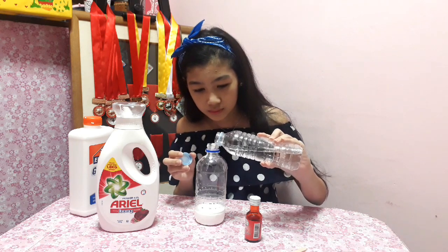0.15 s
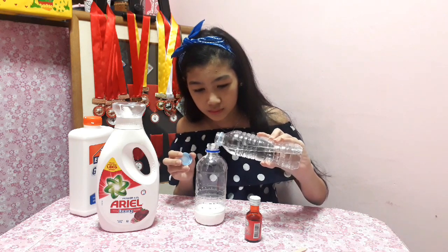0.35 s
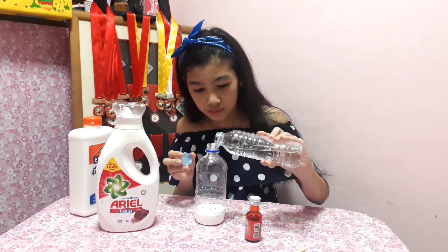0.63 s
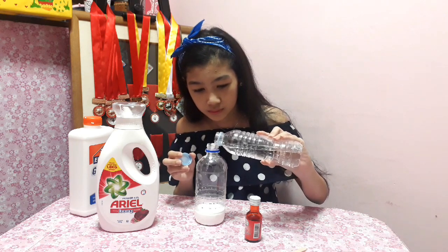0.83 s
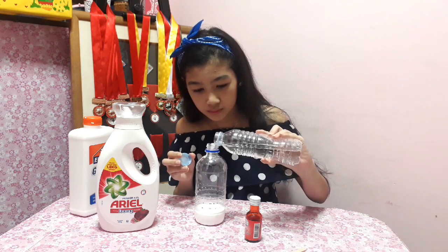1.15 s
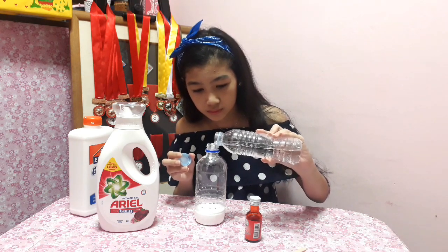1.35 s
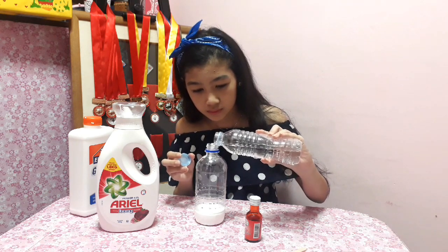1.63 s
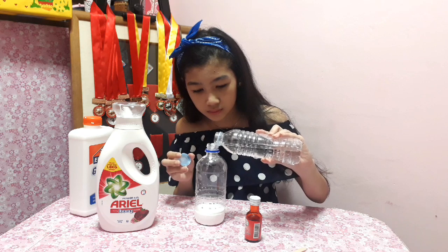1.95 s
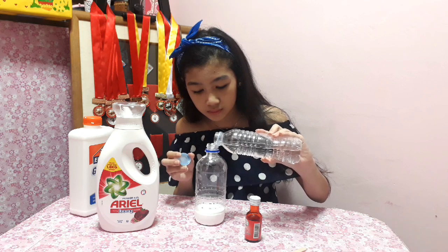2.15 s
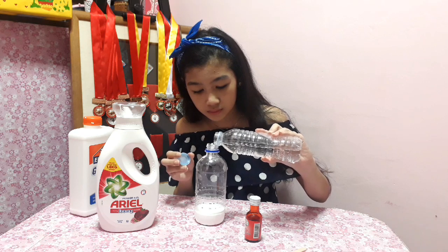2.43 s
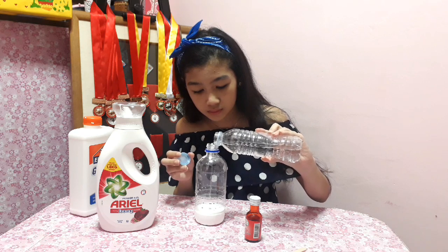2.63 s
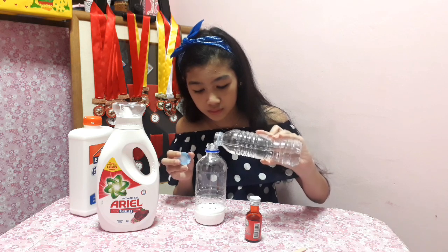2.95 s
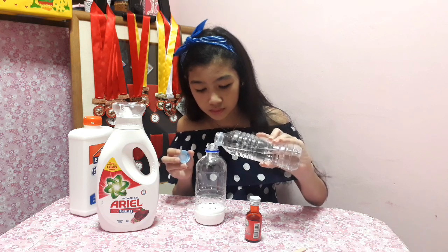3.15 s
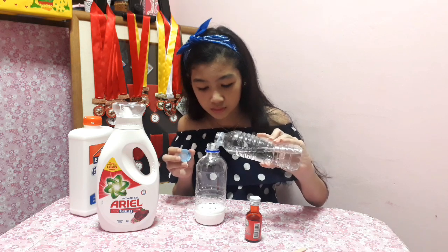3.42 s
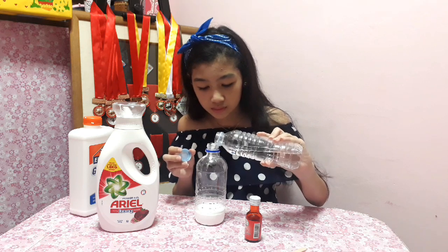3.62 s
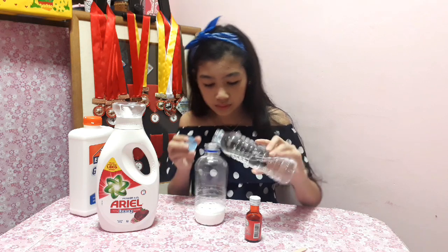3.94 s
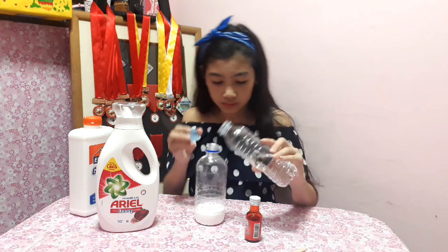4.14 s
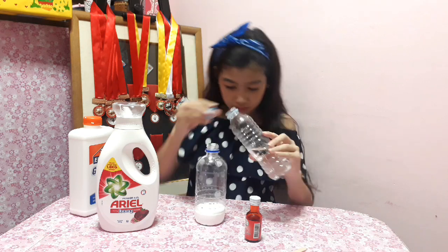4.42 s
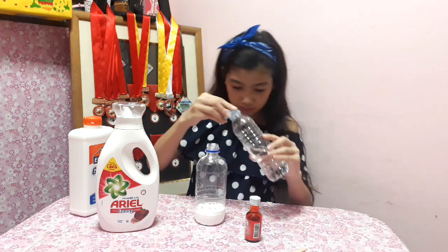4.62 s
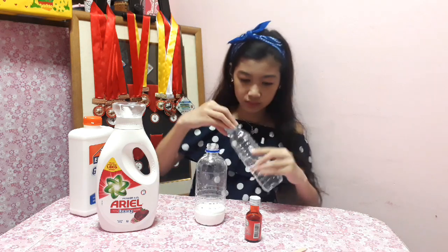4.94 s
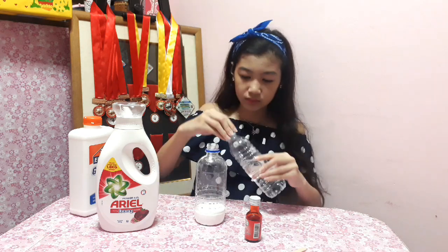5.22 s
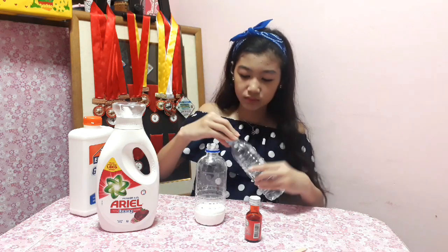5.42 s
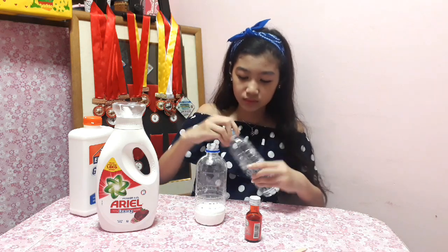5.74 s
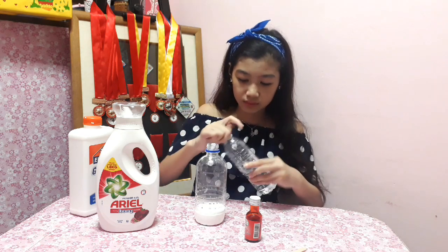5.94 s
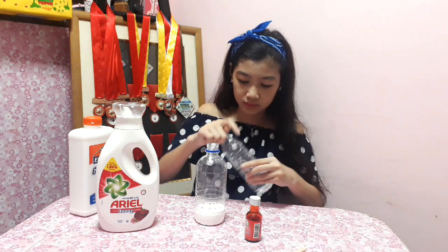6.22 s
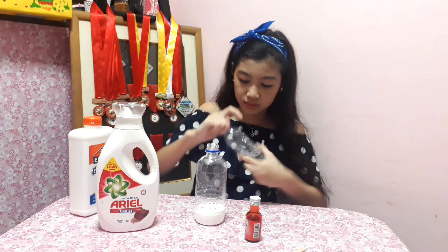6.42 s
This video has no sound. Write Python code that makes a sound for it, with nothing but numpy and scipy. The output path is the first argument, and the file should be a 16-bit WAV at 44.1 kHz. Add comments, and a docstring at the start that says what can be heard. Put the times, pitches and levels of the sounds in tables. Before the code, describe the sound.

In a small, hard-walled room, water dribbles twice from one thin plastic bottle into another, with light splashes and tiny bubbles. The bottle is raised and water glugs hollowly back inside. A cap snaps on and is screwed down with uneven rubbing and small clicks. The thin wall buckles with a loud crack, followed by a few more ticks. The sound is almost mono, straight ahead of the microphone.

```python
"""Water dribbles twice from one thin plastic bottle into another: drop impacts splash and trapped air
bubbles ring as damped oscillators. After a soft bump the bottle is raised and the water glugs back,
exciting its cavity resonances. The cap is screwed on with stick-slip rubbing, clicks and a snap, and
the thin wall buckles with a loud crack. A small, hard room adds reflections and a low murmur of air;
the sound is almost mono."""
import sys
import numpy as np
from scipy import signal
from scipy.fft import rfft, irfft, next_fast_len
from scipy.io import wavfile
from scipy.ndimage import uniform_filter1d, map_coordinates

SR = 44100
rng = np.random.default_rng(int(sys.argv[2]) if len(sys.argv) > 2 else 0)


def unload_wav(signal):
    """Save mono or channel-first audio to the path in sys.argv[1] as 16-bit WAV at rate SR, clipped to [-1, 1]."""
    wavfile.write(
        sys.argv[1],
        SR,
        np.round(np.clip(np.atleast_2d(signal).T, -1, 1) * 32767).astype(np.int16),
    )


N = 290222
T = np.arange(SR // 8) / SR  # time within one impact [s]


def amp(db):
    """Amplitude ratio of a level in decibels."""
    return 10 ** (np.asarray(db) / 20)


def unit(x):
    """Normalisation to rms 1."""
    return x / np.sqrt(np.mean(x ** 2) + 1e-20)


def along(points, hz):
    """Interpolation of (frequency [Hz], value) points on a logarithmic frequency axis."""
    knots_hz, values = np.transpose(points)
    return np.interp(np.log(hz + 1), np.log(knots_hz + 1), values)


def fade(t, t60):
    """Exponential decay, 60 dB down after t60 seconds."""
    return np.exp(-np.log(1000) * t / np.maximum(t60, 1e-4))


def causal(x, gain):
    """Minimum-phase filtering by a gain per frequency: no sound precedes an attack."""
    cepstrum = irfft(np.log(gain + 1e-6))
    half = len(cepstrum) // 2
    cepstrum[1:half] *= 2
    cepstrum[half + 1:] = 0
    return signal.fftconvolve(x, irfft(np.exp(rfft(cepstrum))))[:len(x)]


def coloured(x, *spectra, size=2048):
    """Filters in cascade: their (frequency [Hz], level [dB]) spectra add."""
    hz = np.fft.rfftfreq(size, 1 / SR)
    return causal(x, amp(sum(along(spectrum, hz) for spectrum in spectra)))


def whitened(x, size=8192, bins=27):
    """Spectral whitening: a short random sound loses any pitch of its own."""
    power = np.abs(uniform_filter1d(np.abs(rfft(x, size)) ** 2, bins))
    return causal(x, np.sqrt(power.mean() / (power + 1e-12)))


def wobble(rate):
    """Slow random modulation: a spline through `rate` knots a second."""
    knots = rng.standard_normal(int(N * rate / SR) + 4)
    return map_coordinates(knots, [np.arange(N) * rate / SR])


def grains(rate, spread_db):
    """Shot noise: about `rate` impulses a second, of random sign and size."""
    impulses = (rng.random(N) < rate / SR) * rng.choice([-1, 1], N)
    return unit(impulses * amp(spread_db * np.clip(rng.standard_normal(N), -2, 2)))


def scatter(t60, rise_s):
    """Noise excitation: many tiny pushes build up and die away."""
    pushes = rng.standard_normal(len(T)) * fade(T, t60) * (1 - np.exp(-T / rise_s))
    return unit(whitened(pushes, bins=60))


def burst(t60, grit):
    """Impulsive excitation: a sharp push, then a brief scatter of smaller ones."""
    aftermath = unit(rng.standard_normal(len(T)) * fade(T, t60))
    return unit(whitened(unit(signal.unit_impulse(len(T))) + grit * aftermath))


def resonances(modes, detune):
    """Modal superposition: randomly detuned sinusoids, each damped according to its bandwidth."""
    return unit(sum(amp(db) * width * np.exp(-np.pi * width * T)
                    * np.sin(2 * np.pi * hz * rng.normal(1, detune) * T) for hz, width, db in modes))


def envelope(movements, attack_s, sag_db, release_s):
    """Amplitude envelope: each movement rises, sags over its duration and decays."""
    t = np.arange(N) / SR
    return sum(amp(db - sag_db * np.clip((t - start) / length, 0, 1))
               * np.clip((t - start) / attack_s, 0, 1)
               * fade(np.maximum(t - start - length, 0), release_s) for start, length, db in movements)


def add(track, time_s, db, sound):
    """Superposition: a sound joins the track at the given rms level over its first 20 ms."""
    start = int(time_s * SR)
    part = sound[:N - start] / np.std(sound[:SR // 50])
    track[start:start + len(part)] += amp(db) * part


# reflections from the table top and near walls: (delay [s], gain [ratio])
ECHOES = [(.0007, 0.22), (.0072, 0.39), (.011, .35), (0.017, 0.14)]
# reverberation time of the room: (frequency [Hz], t60 [s])
ROOM_DECAY = [(200, 0.54), (530, 0.096), (1400, 0.2), (3700, 0.2), (9700, 0.18), (15000, 0.16)]


def room(x, wet_db):
    """Reverberation: direct sound, echoes and a diffuse tail, drawn anew per call as the hands move."""
    hz, t, noise = signal.stft(rng.standard_normal(SR // 6), SR, nperseg=256)
    tail = signal.istft(noise * fade(t, along(ROOM_DECAY, hz)[:, None]), SR, nperseg=256)[1]
    tail *= 1 - np.exp(-np.arange(len(tail)) / SR / 0.00087)
    response = amp(wet_db) * tail / np.linalg.norm(tail)
    response[0] += 1  # direct path
    for delay, gain in ECHOES:
        response[int(delay * rng.uniform(.85, 1.15) * SR)] += gain
    return signal.fftconvolve(x, whitened(response))


# spectrum of the room's air: (frequency [Hz], level [dB])
AIR_SPECTRUM = [(12, -33), (20, -20), (27, -23), (55, -6.5), (90, -11.5), (162, -1.5), (197, -10),
                (227, -1), (261, -19.5), (292, -1.5), (317, -12), (397, -10), (620, -16.5), (2430, -23),
                (15800, -38)]


def air():
    """Ambient noise: a steady floor and a low murmur under slow amplitude modulation."""
    steady = unit(coloured(rng.standard_normal(N), AIR_SPECTRUM))
    murmur_band = [(90, -63.5), (150, -2), (200, -7), (290, -3), (450, -24), (900, -74)]
    murmur = unit(coloured(rng.standard_normal(N), murmur_band))
    return amp(-61.5) * (amp(1.5) * steady + amp(-5.5 + 2 * wobble(rate=6.6)) * murmur)


def bubble(hz, cycles=26, glide=0.032, swell_s=0.00046):
    """Minnaert resonance: trapped air pulsates, rising in pitch as it nears the surface."""
    life = 0.007 + cycles / hz
    t = T[:SR // 20]
    pitch = hz * (1 + glide * np.minimum(t / life, 1))
    return unit(np.sin(2 * np.pi * np.cumsum(pitch) / SR) * fade(t, life) * (1 - np.exp(-t / swell_s)))


# bubbles that ring out above the stream: (time [s], frequency [Hz], level [dB])
BUBBLES = [(1.622, 8840, -59.5), (1.63, 2320, -48), (1.647, 1820, -54), (1.659, 2860, -49.5),
           (1.736, 7100, -62), (1.742, 1130, -52), (1.77, 9850, -61), (1.8, 6600, -62), (2.424, 9000, -67),
           (2.441, 2590, -50.5), (2.539, 4800, -54.5), (2.594, 2330, -54), (2.616, 1460, -40),
           (2.707, 10400, -53), (2.71, 1425, -49.5), (2.77, 3000, -54), (2.837, 3070, -51),
           (2.882, 9200, -60), (2.907, 6590, -49), (2.966, 8860, -55), (2.986, 3040, -58),
           (3.069, 3040, -60.5), (3.944, 3150, -51.5), (3.995, 8660, -61)]


def bubbles(count=3, pitch_spread=.28):
    """Bubble fragmentation: each sheds a few weaker ones of nearby pitch a moment later."""
    out = np.zeros(N)
    for time_s, hz, db in BUBBLES:
        cluster = np.zeros(len(T))
        add(cluster, 0, 0, bubble(hz))
        for lag, pitch in rng.random((count, 2)):
            add(cluster, .008 * lag, -8, bubble(hz * np.exp((pitch - .5) * pitch_spread)))
        add(out, time_s, db, room(cluster, wet_db=4))
    return out


# the two tips of the bottle: (start [s], duration [s], relative flow [dB])
DRIBBLES = [(1.628, .19, -52), (2.54, .63, -54)]


def stream(spurt_s=.075, spurt_db=7):
    """Pulsating flow: each dribble gushes, then thins, leaving the neck in even, decaying spurts."""
    t = np.arange(N) / SR
    return sum(envelope([(start, length, db)], attack_s=.017, sag_db=5, release_s=.15)
               * amp(spurt_db * (.5 - (t - start) / spurt_s % 1)) for start, length, db in DRIBBLES)


def gurgle(count=30, gap_s=.022, spread_db=2, first_hz=1557, last_hz=1117, foam_hz=8020):
    """Air entrainment: pockets grow and fall in pitch as the stream digs in; each sheds a foam bubble."""
    out, flow = np.zeros(N), stream()
    dig_at, dig_width = 0.35, 0.056  # shares of the dribble's duration
    for start, length, _ in DRIBBLES:
        ages = gap_s * (np.arange(count) + rng.random(count))
        for age, (strength, pocket_pitch, foam_pitch) in zip(ages, rng.uniform(-1.5, 1.5, (count, 3))):
            depth = (1 + np.tanh((age / length - dig_at) / dig_width)) / 2
            hz = first_hz + depth * (last_hz - first_hz)
            pocket = amp(-5.5) * bubble(hz * np.exp(.04 * pocket_pitch))
            foam = amp(-13) * bubble(foam_hz * np.exp(.22 * foam_pitch), cycles=10)
            pair = pocket + foam
            pair_db = 20 * np.log10(flow[int((start + age) * SR)] * np.std(pair) + 1e-9)
            add(out, start + age, pair_db + spread_db * strength, room(pair, wet_db=-0.7))
    return out


# spectrum of a drop's impact: (frequency [Hz], level [dB])
DROP_SPECTRUM = [(60, -38), (140, -12), (225, 8), (400, -7.5), (650, -3.5), (900, -7.5), (1500, -13),
                 (2400, -10), (4000, -18), (7000, -21), (11000, -22.5), (15500, -29)]
# resonances of the lower bottle: (frequency [Hz], bandwidth [Hz], level [dB])
LOWER_BOTTLE_MODES = [(1144, 55, -2), (1615, 53, -1.5), (3000, 60, 0)]


def trickle():
    """Jet break-up: droplets patter, keep the lower bottle ringing and throw up a fine fizz."""
    flow = stream()
    patter = unit(coloured(signal.unit_impulse(len(T)), DROP_SPECTRUM))
    ring = resonances(LOWER_BOTTLE_MODES, detune=0.0028)
    one_drop = (amp(-3) * patter + amp(-7) * ring) / np.sqrt(len(T))
    drops = signal.fftconvolve(grains(rate=500, spread_db=-1.5) * flow, one_drop)[:N]
    fizz_band = [(2500, -21), (6500, 12), (10000, -11), (15000, -8)]
    fizz = unit(coloured(grains(rate=1100, spread_db=14), fizz_band))
    return amp(-3.5) * room(drops + amp(-19) * fizz * flow, wet_db=1)[:N]


# heavy drops: (time [s], level [dB], treble gain of the spray [dB])
SPLASHES = [(1.646, -50.5, -1), (1.742, -49.5, -20), (1.775, -54, 3), (2.442, -53.5, 3), (2.593, -52, 2),
            (2.615, -43, -9), (2.691, -52, 2), (2.708, -49.5, 7), (2.793, -55, -8), (2.837, -51, -5),
            (2.916, -48.5, 5), (2.985, -55, 1), (3.071, -57, 5), (3.126, -53, -1), (4.092, -61, 13)]


def splashes():
    """Impact noise: single drops strike the liquid and the bottle wall."""
    out = np.zeros(N)
    for time_s, db, spray_db in SPLASHES:
        drop = coloured(scatter(t60=0.035, rise_s=0.0012), DROP_SPECTRUM, [(1500, 0), (8000, spray_db)])
        add(out, time_s, db, room(drop, wet_db=1))
    return out


def bump(time_s=3.225, hz=76, db=-62.5):
    """Damped oscillation: a soft, low bump swells and fades as the pouring stops."""
    out = np.zeros(N)
    swell = (1 - np.exp(-T / .02)) * fade(T, t60=.25) * (1 - T / T[-1])
    add(out, time_s, db, np.sin(2 * np.pi * hz * T) * swell)
    return out


# water slapping back into the raised bottle: (time [s], level [dB])
GLUGS = [(3.932, -51), (3.944, -40.5), (3.970, -37), (4.025, -34.5), (4.077, -40.5), (4.124, -38.5),
         (4.203, -53), (4.233, -45), (4.267, -40), (4.302, -38.5)]
# spectrum of a slap: (frequency [Hz], level [dB])
SLAP_SPECTRUM = [(70, -30), (150, -13), (220, 1), (280, 0), (340, -10.5), (470, 0.5), (620, -11.5),
                 (950, -15), (1300, -13.5), (1600, -26), (2200, -22.5), (4000, -34.5), (9000, -47.5),
                 (15000, -58)]
# resonances of the half-full bottle: (frequency [Hz], bandwidth [Hz], level [dB])
CAVITY_MODES = [(209, 22, -9), (259, 19, 7), (408, 25, 0), (484, 54, -6), (780, 38, -5), (1140, 46, -1)]


def glugs(first_bright_db=5, dulling_db_per_s=22, rebound_s=.042, rebound_db=-15):
    """Cavity resonance: each slap excites the bottle and rebounds once; the tone dulls as water calms."""
    out = np.zeros(N)
    for time_s, db in GLUGS:
        bright_db = first_bright_db - dulling_db_per_s * (time_s - GLUGS[0][0])
        tilt = [(100, -7), (200, 1), (400, 1.5), (2500, bright_db), (8000, 2 * bright_db)]
        for lag, loss_db in [(0, 0), (rebound_s, rebound_db)]:
            slap = unit(coloured(scatter(t60=0.023, rise_s=0.0005), SLAP_SPECTRUM))
            cavity = amp(-5.5) * resonances(CAVITY_MODES, detune=0.015)
            add(out, time_s + lag, db + loss_db, room(coloured(slap + cavity, tilt), wet_db=0))
    return out


# turns of the cap: (start [s], duration [s], relative level [dB])
TURNS = [(4.56, 0.068, -57), (4.70, 0.11, -60), (5.053, .055, -44), (5.29, .09, -52.5), (5.40, 0.067, -53),
         (5.586, .068, -44), (5.70, 0.073, -52), (5.81, 0.04, -53.5), (5.92, 0.038, -59), (6.345, .17, -52)]
# spectrum of rubbed plastic: (frequency [Hz], level [dB])
RUB_SPECTRUM = [(200, -31), (450, -1.5), (1100, -1), (1600, -3.5), (2500, -1), (3300, -5.5), (4600, -12),
                (7500, -16), (11000, -22), (15000, -27)]


def rubbing():
    """Stick-slip friction: the cap thread and fingers move over the plastic in small, uneven jerks."""
    pressure = envelope(TURNS, attack_s=.02, sag_db=3.5, release_s=0.27)
    jerks = grains(rate=800, spread_db=4)
    return amp(-5.5) * room(unit(coloured(jerks, RUB_SPECTRUM)) * pressure, wet_db=.5)[:N]


# ticks of the cap over its thread: (time [s], level [dB], focus on the neck's own range [dB])
TICKS = [(4.59, -51.5, 4), (4.705, -52.5, 0), (4.886, -51.5, -4), (5.065, -49.5, -4), (5.304, -51, -2),
         (5.448, -46, 0), (5.599, -49, 0), (5.661, -35.5, 4.5), (6.038, -55.5, -12), (6.471, -46, 5),
         (6.536, -43.5, -1.5)]
# spectrum of a tick: (frequency [Hz], level [dB])
TICK_SPECTRUM = [(180, -39), (300, -9.5), (781, -9), (1070, -5.5), (1870, -8), (2280, -3), (2650, -7.5),
                 (3180, -7), (4490, -17), (7140, -19.5), (8140, -25), (10300, -25.5), (15500, -39)]
# resonances of cap and neck under the fingers: (frequency [Hz], bandwidth [Hz], level [dB])
NECK_MODES = [(1150, 180, 1), (2240, 91, 4), (2930, 180, -3)]
# spectrum of the cap's snap: (frequency [Hz], level [dB])
SNAP_SPECTRUM = [(80, -21), (220, -5.5), (290, 0), (400, -6), (680, -7), (850, 0), (1150, -0.5),
                 (1700, -12), (2700, 1.5), (3700, -6.5), (6500, -8), (9500, -1.5), (12000, -11.5),
                 (15500, -18)]


def cap(snap_s=4.898, snap_db=-31):
    """Impulse response: the cap snaps on and ticks over its thread; the shifting grip retunes each tick."""
    out = np.zeros(N)
    snap = coloured(burst(t60=0.0053, grit=2.3), SNAP_SPECTRUM)
    add(out, snap_s, snap_db, room(snap, wet_db=3))
    for time_s, db, focus_db in TICKS:
        tick = unit(coloured(burst(t60=0.023, grit=3), TICK_SPECTRUM))
        neck = amp(-5) * resonances(NECK_MODES, detune=.05)
        focus = [(900, 2 - focus_db), (2500, 0), (7000, 1 - focus_db)]
        add(out, time_s, db, room(coloured(tick + neck, focus), wet_db=.5))
    return out


# the wall buckles and springs back: (time [s], level [dB], treble gain [dB], relative ring level [dB])
BUCKLES = [(6.097, -25, 2, -6), (6.123, -26.5, -8, -9), (6.127, -22, 3.5, -5.5), (6.135, -29.5, -2, -3)]
# spectrum of creasing plastic: (frequency [Hz], level [dB])
CRACK_SPECTRUM = [(40, -12.5), (120, -35), (290, -10), (400, -11), (500, -5), (640, 3.5), (800, -4),
                  (1250, 1.5), (1750, -0.5), (2400, -2), (3300, 0), (4000, -6.5), (8500, -9.5),
                  (15500, -21)]
# modes of the thin bottle wall: (frequency [Hz], level [dB])
WALL_MODES = [(679, -17), (912, -2), (1097, -8), (1168, 3.5), (1233, -10.5), (1274, 1), (1470, -5),
              (1769, 2.5), (1997, 2), (2718, -4), (3086, -3.5), (3222, -2), (3323, 2.5), (4340, -5)]


def buckles():
    """Shell buckling: a rush of tiny creases makes a broad crack, and the wall's modes ring briefly."""
    out = np.zeros(N)
    for time_s, db, crisp_db, ring_db in BUCKLES:
        creases = scatter(t60=0.013, rise_s=0.00018)
        crack = coloured(creases, CRACK_SPECTRUM, [(2500, 0.015), (7000, crisp_db)])
        ring = sum(amp(level) * np.sin(2 * np.pi * (hz * T + rng.random())) for hz, level in WALL_MODES)
        add(out, time_s, db, room(crack, wet_db=1.5))
        add(out, time_s, db + ring_db, ring * fade(T, t60=0.16))
    return out


# spectrum of the hiss that differs between the channels: (frequency [Hz], level [dB])
HISS_SPECTRUM = [(20, -11), (60, -12), (150, -6.5), (400, -6), (1500, -9), (5000, -15.5), (15000, -24)]


def scene():
    """Mid-side stereo: all handling is straight ahead; the side holds a trace of room sound and hiss."""
    water = bubbles() + gurgle() + splashes() + trickle() + bump() + glugs()
    mid = water + cap() + buckles() + rubbing() + air()
    side = amp(-87) * room(mid, wet_db=-4)[:N]
    side += amp(-71.5) * unit(coloured(rng.standard_normal(N), HISS_SPECTRUM))
    return np.array([mid + side, mid - side])


def record(dry, cutoff_hz=15900, edge_hz=200):
    """Band limiting: a steep low-pass filter removes the highest treble."""
    size = next_fast_len(N + SR // 2)
    hz = np.fft.rfftfreq(size, 1 / SR)
    passband = np.clip((cutoff_hz - hz) / edge_hz + .5, 0, 1)
    return irfft(rfft(dry, size) * passband, size)[:, :N]


dry = scene()
out = record(dry)
unload_wav(out)
```